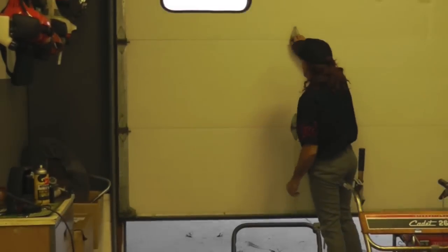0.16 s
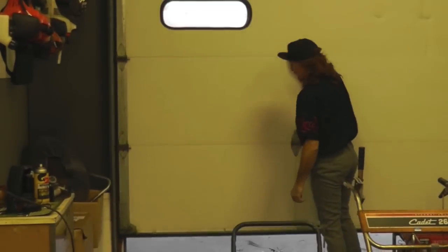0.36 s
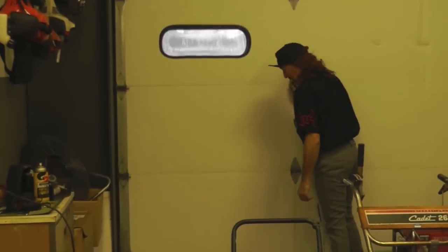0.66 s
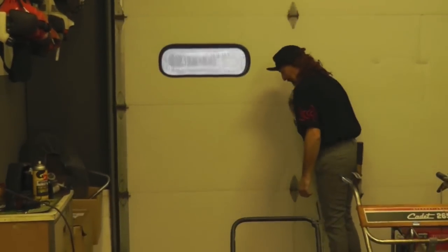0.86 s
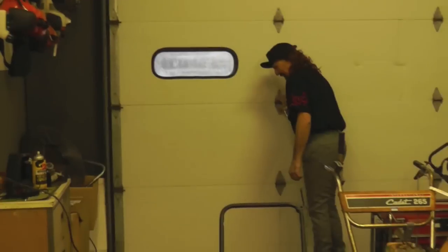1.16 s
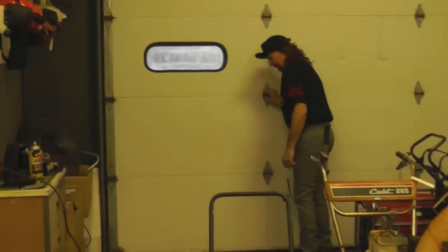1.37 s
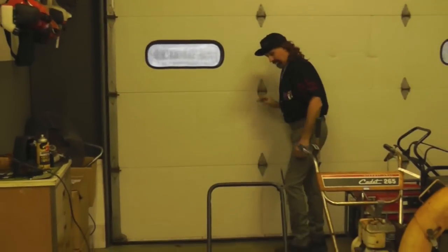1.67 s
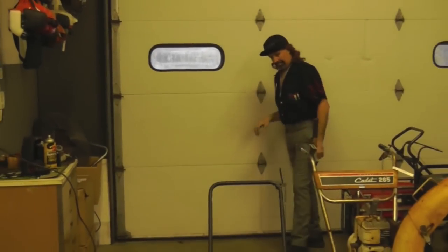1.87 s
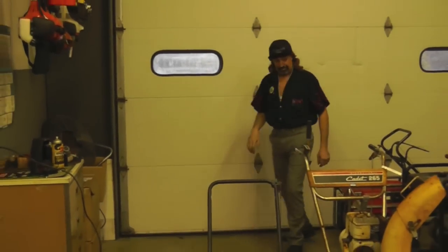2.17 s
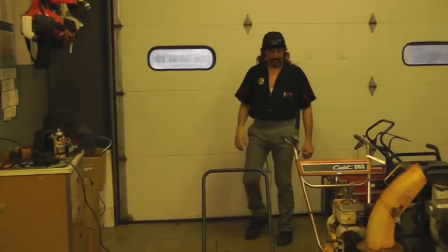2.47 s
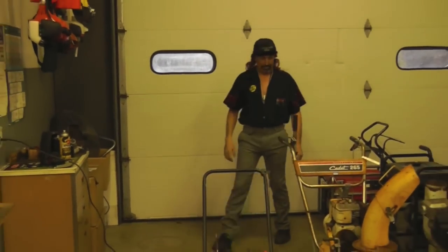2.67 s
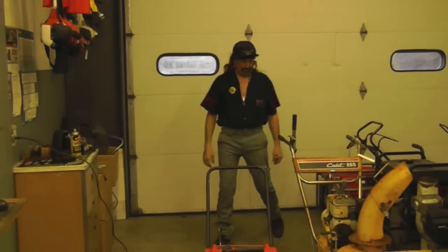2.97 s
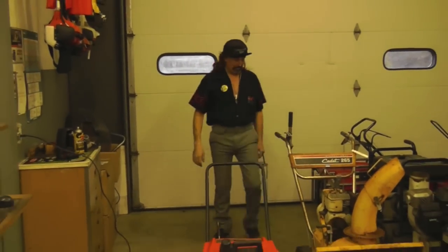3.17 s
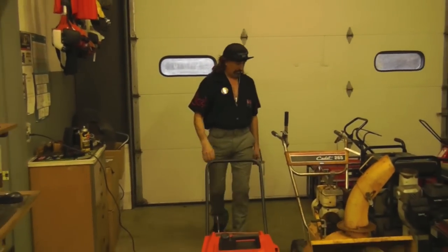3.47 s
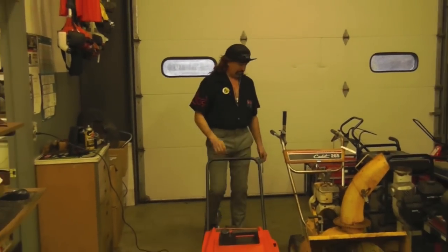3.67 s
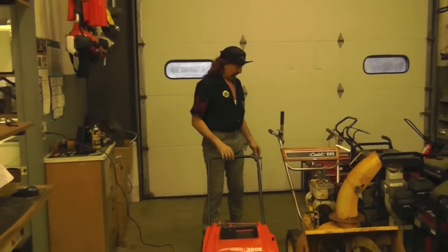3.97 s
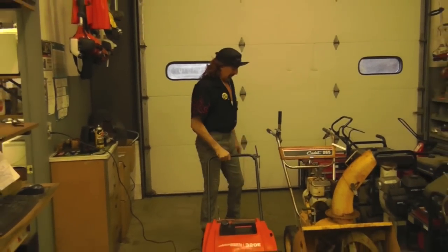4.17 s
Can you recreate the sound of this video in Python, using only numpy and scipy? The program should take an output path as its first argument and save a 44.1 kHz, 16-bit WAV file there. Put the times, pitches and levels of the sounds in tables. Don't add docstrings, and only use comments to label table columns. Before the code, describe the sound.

A sectional overhead door rumbles and rattles down its tracks, bangs onto the floor, then boots scuff and knock on gritty concrete in a reverberant workshop.

```python
import sys
import numpy as np
from scipy import signal
from scipy.fft import rfft, irfft
from scipy.io import wavfile

SR = 44100
rng = np.random.default_rng(int(sys.argv[2]) if len(sys.argv) > 2 else 0)


def to_linear_factor(level_db):
    exponent = np.asarray(level_db, float) / 20
    return 10 ** exponent


def store_wav(level_fs):
    pcm = np.round(np.clip(np.atleast_2d(level_fs), -1, 1) * 32767)
    wavfile.write(sys.argv[1], SR, pcm.T.astype(np.int16))


N = 190512

# frequency_hz, density_db (dB per Hz)
AIR_SPECTRUM = [(15, -56), (25, -12), (75, -2.5), (140, -6.5), (210, -3.5), (233, -8), (322, -3.5),
                (411, -11.5), (483, -9), (784, -14), (1340, -16.5), (1760, -23.5), (1910, -19.5),
                (4270, -30.5), (15600, -34)]
# frequency_hz, width_hz, level_db
FAN_TONES = [(86.8, 9.9, -68.5), (122.85, 8.4, -61), (884, 37, -68), (1354, 37, -75), (2600, 440, -72)]
# start_s, level_db, pitch_hz, decay_cycles (to fall 60 dB; negative: to rise 60 dB)
HEEL_KNOCKS = [(1.645, -35, 393, 15), (1.661, -35.5, 306, 20), (1.668, -39, 636, 29), (1.679, -38, 356, 12),
               (2.063, -34.5, 506, 2), (2.108, -39, 265, 11), (2.697, -29.5, 650, 11.5),
               (2.851, -35, 620, 15), (2.862, -33.5, 266, 7), (2.865, -30, 1060, 3), (2.869, -38, 443, 10),
               (3.85, -44, 30, -6), (4.247, -43, 300, -2.5), (4.284, -41, 150, 3), (4.292, -30.5, 600, 2.5),
               (4.297, -33, 294, 2), (4.308, -38, 530, 22)]
# start_s, rise_s, hold_s, level_db, pitch_hz
GRIT_SCUFFS = [(1.549, 0.016, 0.045, -57.5, 2780), (1.57, .0044, .026, -61.5, 8000),
               (1.641, .0088, .015, -60.5, 5400), (1.987, 0.0035, 0.0087, -42, 7000),
               (1.99, 0.032, 0.0034, -36.5, 4260), (2.053, 0.0026, .018, -51.5, 1150),
               (2.315, .003, .025, -59, 7470), (2.697, 0.0047, 0.027, -37.5, 5080),
               (2.733, .012, 0.042, -44, 3730), (2.92, 0.014, .037, -63, 8400),
               (3.317, 0.028, 0.027, -23, 3980), (3.319, .01, 0.02, -33.5, 9000),
               (3.819, 0.00086, 0.024, -28.5, 4200), (3.82, 0.0012, 0.015, -33.5, 9500),
               (3.827, 0.0023, 0.029, -20.5, 4170), (3.87, 0.0035, 0.031, -29, 2376),
               (3.968, 0.16, 0.27, -52, 1020), (4.067, 0.012, 0.13, -47, 4000),
               (4.072, 0.016, 0.089, -55, 9500), (4.167, 0.0061, 0.022, -48.5, 1550),
               (4.279, 0.0011, 0.023, -49, 7180)]
# start_s, hold_s, level_db
SOLE_DRUMMING = [
    (2.001, 0.026, -51.5),
    (2.709, .055, -49.5),
    (3.319, 0.043, -40),
    (3.832, 0.041, -45),
]
# start_s, hold_s, level_db, pitch_hz
SOLE_SQUEAKS = [
    (4.003, .045, -44.5, 2140),
]
# start_s, hold_s, level_db
HINGE_CHAFES = [
    (0.161, 0.11, -43),
    (0.255, 0.011, -40),
    (0.322, 0.015, -36),
    (0.45, .019, -42),
    (0.591, 0.011, -40.5),
    (0.705, 0.0125, -45),
]
# start_s, hold_s, level_db,
# pitch_hz
HARDWARE_SHAKES = [
    (.835, 0.17, -37, 6300),
    (0.991, 0.079, -27, 1976),
    (0.985, 0.065, -37.5, 6060),
    (1.015, 0.017, -22.5, 3704),
    (1.082, 0.0044, -19.5, 4170),
]
# frequency_hz, level_db, t60_s
DOOR_MODES = [(119, -24, 0.11), (150, 1.5, 0.034), (211, 1, 0.028), (276.3, -6.5, 0.12), (369, -7, 0.12),
              (543, -9, 0.081), (790, -3, 0.03), (871, 6.5, 0.0061), (1175, -6, 0.015), (1480, -12, 0.088),
              (1970, -6, 0.013)]
# start_s, push_db (whole door), slap_db (edge)
EDGE_LANDING = [
    (.9945, -48, -18.5),
    (.9975, -17, -18),
    (1.006, -35, -17),
    (1.011, -20, -24),
    (1.019, -26, -20.5),
]
# frequency_hz, density_db (dB per Hz)
ROLLING_SPECTRUM = [(25, 19.5), (60, -9), (120, -5.5), (250, 0.5), (420, 5.5), (750, -1.5), (1100, -0.5),
                    (2000, 3), (4000, -13), (6500, -21), (10000, -27.5), (15500, -24)]
# frequency_hz, width_hz, level_db (over the broad rumble)
PANEL_RESONANCES = [(136, 57, -17.5), (185, 71, -3), (257, 69, -14), (600, 200, -9), (743, 45, -18),
                    (1352, 36, -18.5), (2180, 270, -28)]
# time_s, rolling_db (effort), flexing_db (sections swinging round the bend of the track)
DOOR_TRAVEL = [
    (0.01, 0, -4.5),
    (0.14, -5.5, -7),
    (0.35, 2, 3.5),
    (0.46, -1.5, 8),
    (0.54, -3, -3.5),
    (0.74, -0.5, 0.5),
    (0.82, 1.5, -8.5),
    (0.93, 4, 0.5),
    (0.986, 1.5, 6.5),
]
# level_db, rolling_share (ratio), flexing_share (ratio)
BOOM_LAYER = (-36, 0.94, 0.49)
DRUMMING_LAYER = (-30.5, .1, 0.77)
RATTLE_LAYER = (-28, 0.69, 0.073)
HISS_LAYER = (-32.5, 1.02, 0.058)
# frequency_hz, t60_s
ROOM_DECAY = [(60, 0.94), (150, 0.79), (500, 0.71), (1500, 0.84), (4000, 0.77), (8000, 0.38), (15000, 0.45)]
# frequency_hz, coherence (0 to 1)
CAPSULE_LIKENESS = [(30, 0.59), (70, 0.834), (150, 0.9), (400, 0.58), (800, 0.46), (1300, 0.22),
                    (2400, 0.61), (3500, 0.74), (5500, 0.85), (7500, 0.68), (10000, 0.05), (15000, 0.054)]
# frequency_hz, width_hz, depth_db
HOUSING_NOTCHES = [(1778, 280, 8), (2373, 176, 36), (3085, 95, 13), (1110, 33, 1), (5000, 1200, 2),
                   (6470, 690, -2)]


def unit(x):
    return x / np.sqrt(np.mean(x ** 2) + 1e-20)


def at_hz(points, hz):
    points_hz, values = np.array(points)[:, 0], np.array(points)[:, 1]
    return np.interp(np.log(hz + 1), np.log(points_hz), values)


def coloured(x, spectrum):
    size = x.shape[-1]
    gain = to_linear_factor(at_hz(spectrum, np.fft.rfftfreq(size, 1 / SR)))
    return irfft(rfft(x) * gain, size)


def pair(mid, side):
    size = len(mid)
    alike = np.clip(at_hz(CAPSULE_LIKENESS, np.fft.rfftfreq(size, 1 / SR)), 0, 1)
    common = rfft(mid) * np.sqrt((1 + alike) / 2)
    opposed = rfft(side) * np.sqrt((1 - alike) / 2)
    return irfft(np.array([common + opposed, common - opposed]), size)


def band(x, low_hz, high_hz):
    limits_hz = [low_hz, min(high_hz, 19000)]
    return signal.sosfilt(signal.butter(2, limits_hz, "band", fs=SR, output="sos"), x)


def resonance(x, hz, width_hz):
    radius = np.exp(-np.pi * width_hz / SR)
    feedback = [1, -2 * radius * np.cos(2 * np.pi * hz / SR), radius * radius]
    return signal.lfilter([1, 0, -1], feedback, x)


def ring(clicks, hz, t60):
    radius, turn = to_linear_factor(-60 / (t60 * SR)), 2 * np.pi * hz / SR
    feedback = [1, -2 * radius * np.cos(turn), radius * radius]
    return signal.lfilter([0, np.sin(turn)], feedback, clicks + 1e-18)


def soft_ring(hz, t60, contact_cycles):
    push = np.hanning(round(contact_cycles * SR / hz) + 3)
    push = np.pad(push, (0, SR // 2))[:SR // 2]
    tone = ring(np.gradient(push), hz, t60)
    return tone / np.max(np.abs(tone))


def grains(size, per_s, spread_db):
    strength = to_linear_factor(spread_db * np.minimum(rng.exponential(1, size), 4))
    strength = strength * rng.choice([-1, 1], size)
    return unit(strength * (rng.random(size) < per_s / SR))


def wander(size, rate_hz):
    slow = signal.butter(2, rate_hz, fs=SR, output="sos")
    return unit(signal.sosfilt(slow, rng.standard_normal(size)))


def workshop(dry, direct_db, build_up_s, off_centre):
    t = np.arange(SR) / SR
    edges_hz = 22 * 2 ** np.arange(0, 9.8, .5)
    white = rng.standard_normal((2, 2, SR))
    tail = 0
    for k, (low_hz, high_hz) in enumerate(zip(edges_hz, edges_hz[1:])):
        decay = to_linear_factor(-60 * t / at_hz(ROOM_DECAY, np.sqrt(low_hz * high_hz)))
        fade = decay * (1 - np.exp(-t / build_up_s))
        tail = tail + band(white[k % 2], low_hz, high_hz) * fade / np.sqrt(np.sum(fade ** 2))
    tail[:, 0] += to_linear_factor(direct_db) * np.array([1, off_centre])
    response = pair(*tail)[:, :3 * SR // 4]
    return signal.fftconvolve(dry[None], response, axes=1)[:, SR:SR + N]


def air():
    noise = to_linear_factor(-51.5) * unit(coloured(rng.standard_normal((2, N)), AIR_SPECTRUM))
    for hz, width_hz, db in FAN_TONES:
        tone = resonance(rng.standard_normal((2, N)), hz, width_hz)
        noise = noise + to_linear_factor(db) * unit(resonance(tone, hz, width_hz))
    lamp = to_linear_factor(-63.5) * np.sin(2 * np.pi * 1324 * np.arange(N) / SR)
    return pair(*noise) + lamp * to_linear_factor([[-1.5], [1.5]])


def knocks():
    out = np.zeros(2 * SR + N)
    for s, db, hz, cycles in HEEL_KNOCKS:
        knock = soft_ring(hz, cycles / hz, contact_cycles=0.7)
        out[SR + round(s * SR):][:SR // 2] += to_linear_factor(db - 3.0) * knock
    return out[:SR + N]


def soles():
    span = 2.19
    rise_s = .015
    grit = [(s, rise, hold, db, hz / span, hz * span) for s, rise, hold, db, hz in GRIT_SCUFFS]
    sole = [(s, rise_s, hold, db, 411, 1810) for s, hold, db in SOLE_DRUMMING]
    squeak = [(s, rise_s, hold, db, hz / 1.05, hz * 1.1) for s, hold, db, hz in SOLE_SQUEAKS]
    return grit + sole + squeak


def hardware():
    span = 1.71
    chafes = [(s, 0.0045, hold, db, 4200, 11570) for s, hold, db in HINGE_CHAFES]
    shakes = [(s, 0.13 * hold, hold, db, hz / span, hz * span) for s, hold, db, hz in HARDWARE_SHAKES]
    return chafes + shakes


def scuffs(rows):
    out, t = np.zeros(2 * SR + N), np.arange(SR // 3) / SR
    for s, rise, hold, db, low_hz, high_hz in rows:
        release_s = 0.0042 + 0.39 * min(hold, .06)
        swell = np.clip(t / rise, 0, 1) ** 1.17
        stroke = swell * np.exp(-np.maximum(t - rise - hold, 0) / release_s)
        grit = band(grains(len(t), per_s=15000, spread_db=2.5), low_hz, high_hz)
        grit = unit(band(grit, 0.48 * low_hz, 1.09 * high_hz))
        out[SR + round(s * SR):][:len(t)] += to_linear_factor(db - 0.29) * stroke * grit
    return out[:SR + N]


def folds(count):
    first_s, gap_s, slowing = 1.028, 0.0074, 1.08
    k = np.arange(count)
    s = first_s + np.cumsum(gap_s * slowing ** k) - gap_s
    push_db, slap_db = -24.5 - 6 * k, -23 - 2 * k
    return list(EDGE_LANDING) + list(zip(s, push_db, slap_db))


def bang(rows):
    out = np.zeros(SR + N)
    uneven_db = rng.normal(0, 1.0, (len(rows), len(DOOR_MODES)))
    for (s, push_db, slap_db), row_db in zip(rows, uneven_db):
        rings = 0
        for (hz, mode_db, t60), chance_db in zip(DOOR_MODES, row_db):
            strike_db = push_db if hz < 450 else slap_db
            level = to_linear_factor(strike_db + mode_db + chance_db + 1.5)
            rings = rings + level * soft_ring(hz, t60, contact_cycles=0.53)
        out[SR + round(s * SR):][:SR // 2] += rings
    return out


def rollers(judder):
    size = SR + round(1.3 * SR)
    contacts = coloured(grains(size, per_s=2500, spread_db=4.0), ROLLING_SPECTRUM)
    door = unit(contacts)
    for hz, width_hz, db in PANEL_RESONANCES:
        door = door + to_linear_factor(db) * unit(resonance(contacts, hz, width_hz))
    boom, drumming = band(door, 47, 140), band(door, 179, 365)
    rattle, hiss = band(door, 487, 1880), band(contacts, 2650, 12100)
    layers = [(boom, BOOM_LAYER), (drumming, DRUMMING_LAYER), (rattle, RATTLE_LAYER), (hiss, HISS_LAYER)]
    t = np.arange(size) / SR - 1
    s, rolling_db, flexing_db = np.transpose(DOOR_TRAVEL)
    moving = 0
    for (x, (level_db, rolling_share, flexing_share)), uneven in zip(layers, judder):
        travel_db = level_db + rolling_share * rolling_db + flexing_share * flexing_db
        moving = moving + unit(x) * to_linear_factor(np.interp(t, s, travel_db) + 3 * uneven[:size])
    stop = np.clip((s[-1] - t) / .02 + 1, 0, 1)
    return np.pad(moving * stop, (0, SR + N - size))


def scene():
    judder = [wander(N, rate_hz=30) for layer in range(4)]
    mix = air() + workshop(knocks(), direct_db=3.0, build_up_s=0.0022, off_centre=.15)
    strokes = hardware() + soles()
    for k, place in enumerate((0.044, 0.38, 0.35, -0.22)):
        mix = mix + workshop(scuffs(strokes[k::4]), direct_db=1.5, build_up_s=0.00079, off_centre=place)
    contacts = folds(count=7)
    for k, place in enumerate((-.4, -.1, .3)):
        mix = mix + workshop(bang(contacts[k::3]), direct_db=4.0, build_up_s=0.0027, off_centre=place)
    for place in (-0.34, -0.11, -0.086, -0.26):
        rolling = to_linear_factor(-4.0) * rollers(judder)
        mix = mix + workshop(rolling, direct_db=-4.0, build_up_s=0.0013, off_centre=place)
    return mix * to_linear_factor([[-.3], [.3]])


def low_pass(x):
    return signal.sosfilt(signal.butter(12, 15700, fs=SR, output="sos"), x)


def record(dry):
    x = signal.sosfilt(signal.butter(3, 53.4, "high", fs=SR, output="sos"), dry)
    for hz, width_hz, depth_db in HOUSING_NOTCHES:
        b, a = signal.iirpeak(hz, hz / width_hz, fs=SR)
        x = x - (1 - to_linear_factor(-depth_db)) * signal.lfilter(b, a, x)
    rounded = .9 * np.tanh(x / .9)
    finished = signal.sosfilt(signal.cheby2(10, 50, 16000, fs=SR, output="sos"), rounded)
    return low_pass(finished)


dry = scene()
out = record(dry)
store_wav(out)
```